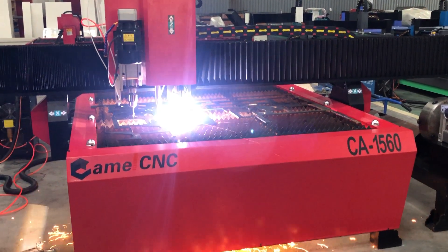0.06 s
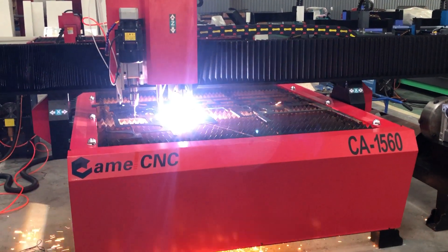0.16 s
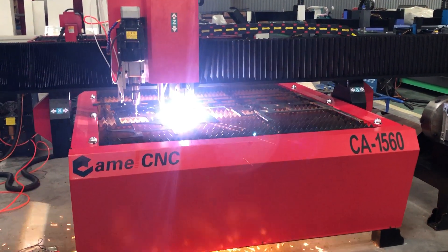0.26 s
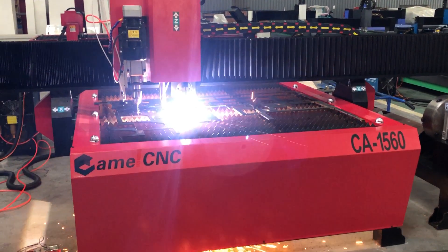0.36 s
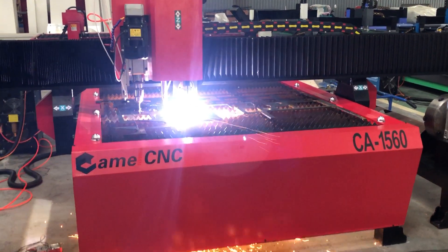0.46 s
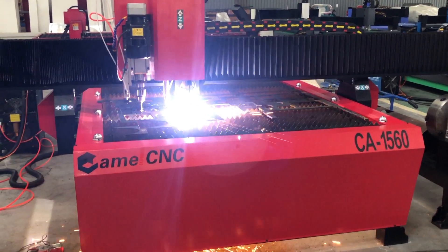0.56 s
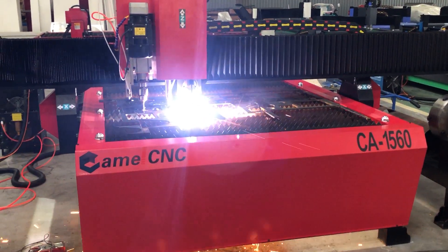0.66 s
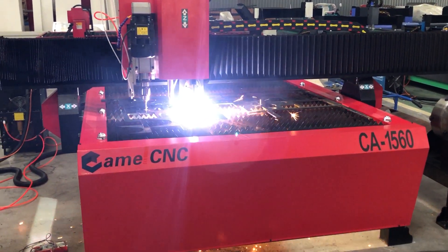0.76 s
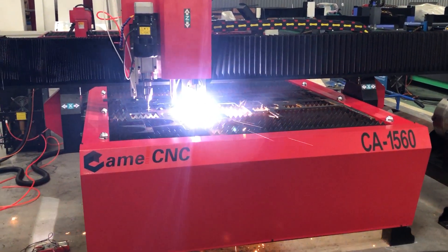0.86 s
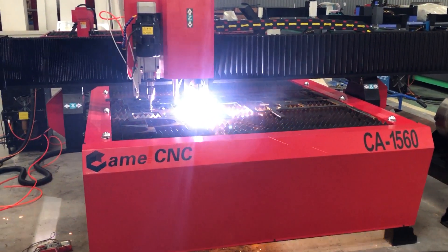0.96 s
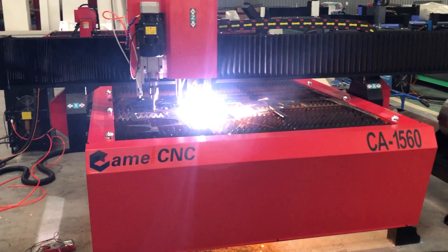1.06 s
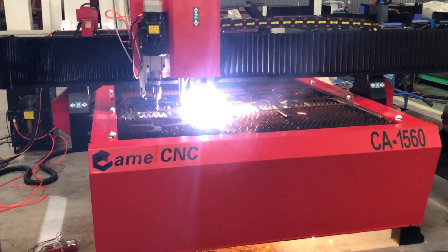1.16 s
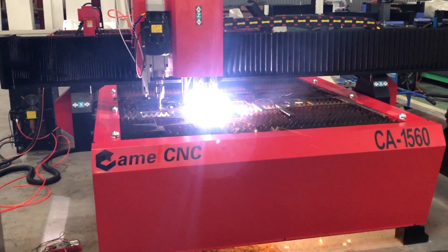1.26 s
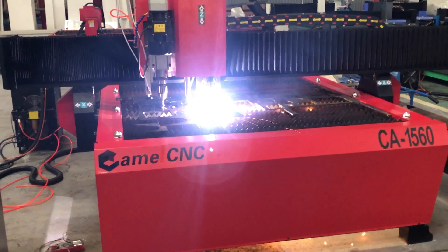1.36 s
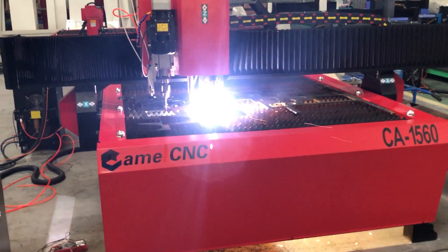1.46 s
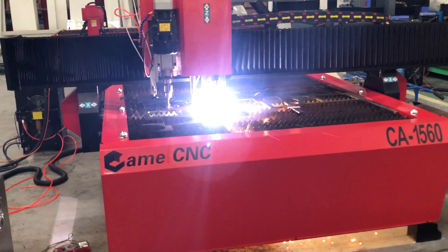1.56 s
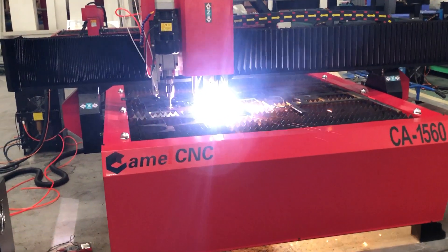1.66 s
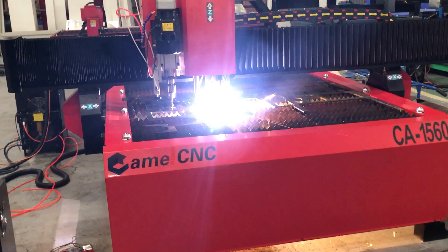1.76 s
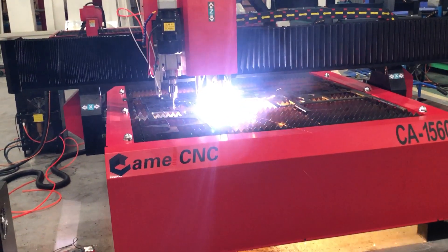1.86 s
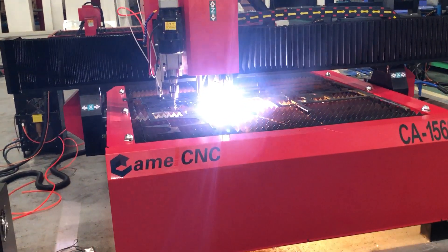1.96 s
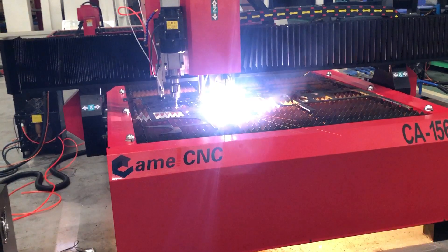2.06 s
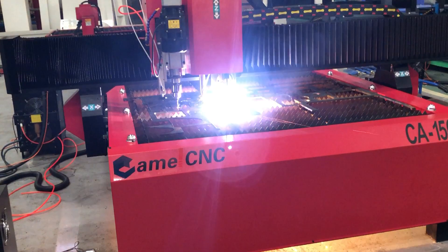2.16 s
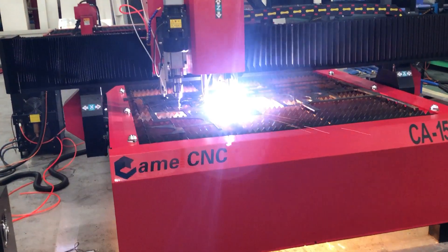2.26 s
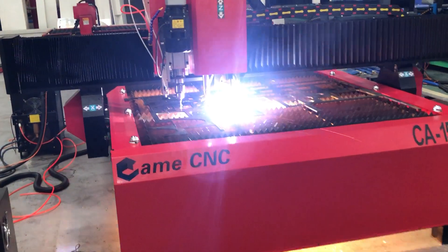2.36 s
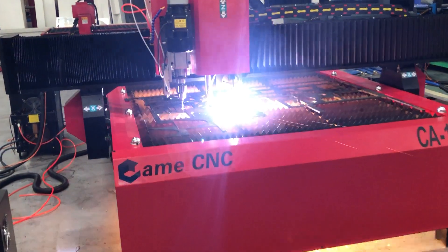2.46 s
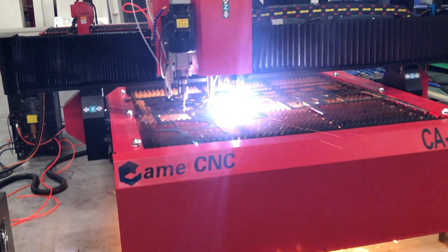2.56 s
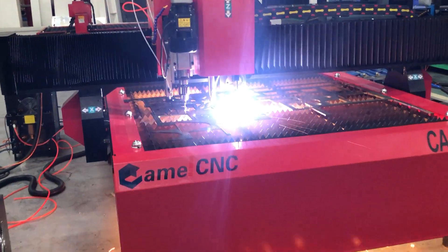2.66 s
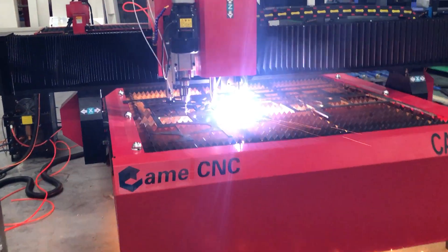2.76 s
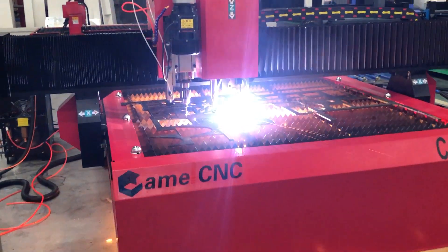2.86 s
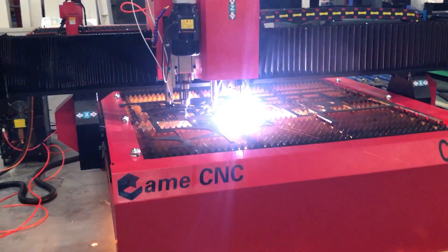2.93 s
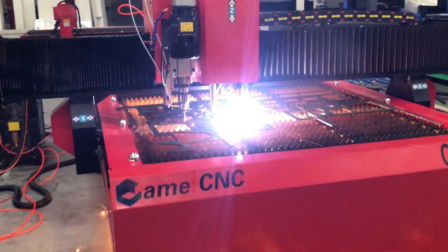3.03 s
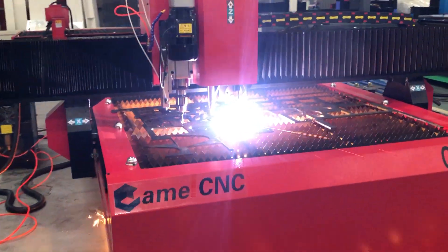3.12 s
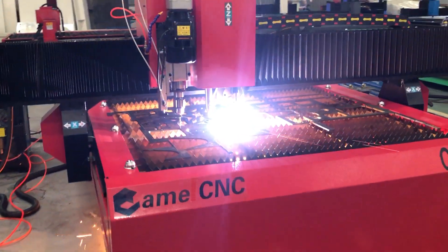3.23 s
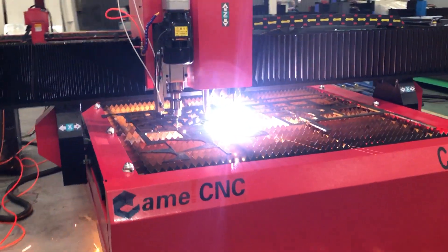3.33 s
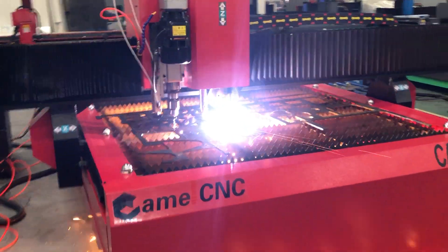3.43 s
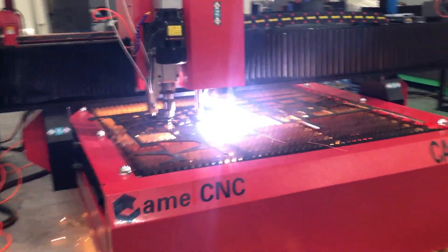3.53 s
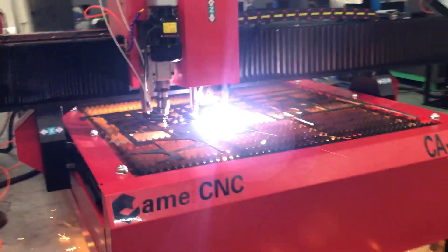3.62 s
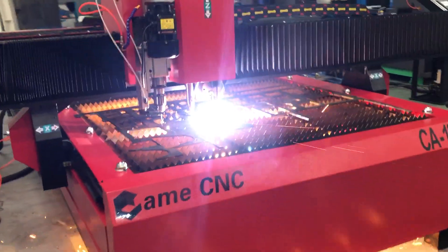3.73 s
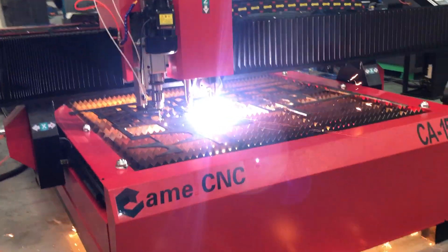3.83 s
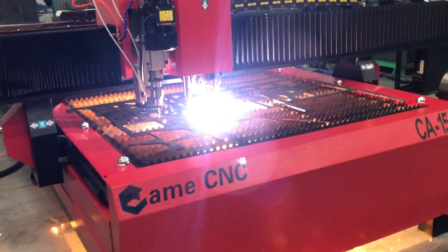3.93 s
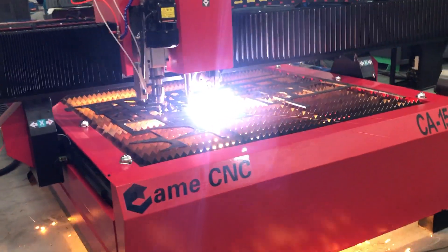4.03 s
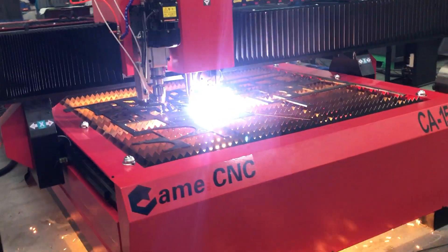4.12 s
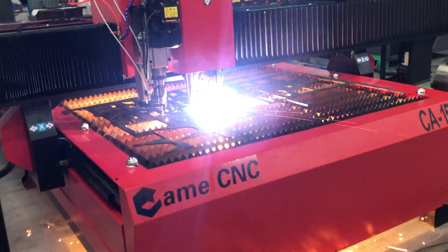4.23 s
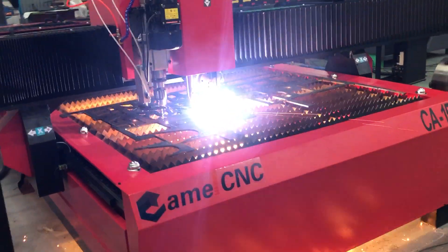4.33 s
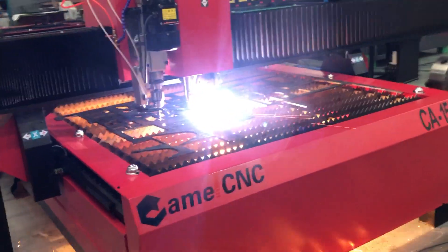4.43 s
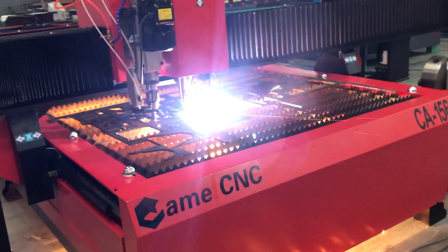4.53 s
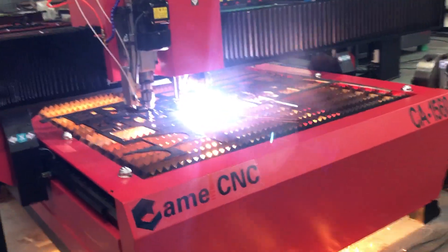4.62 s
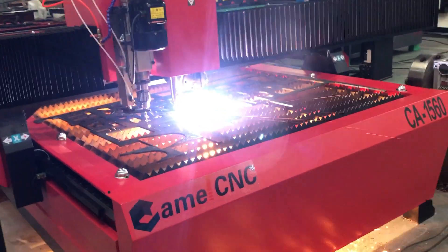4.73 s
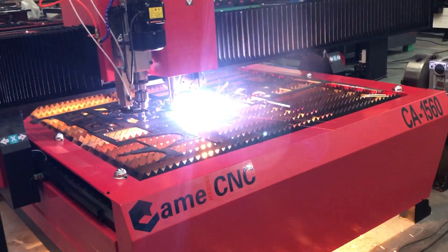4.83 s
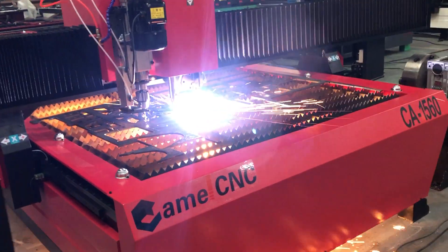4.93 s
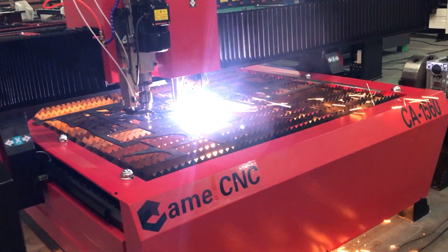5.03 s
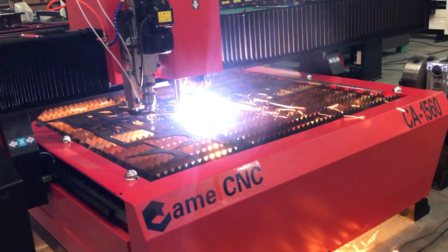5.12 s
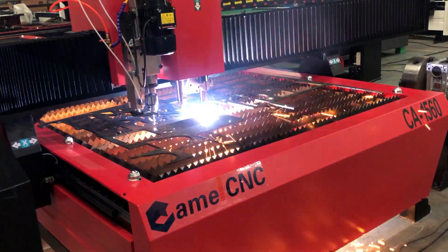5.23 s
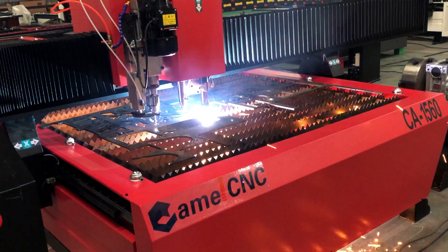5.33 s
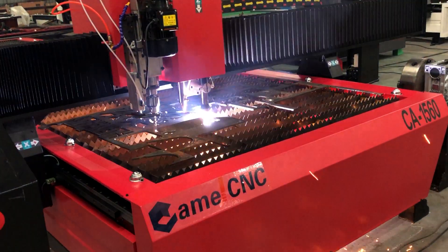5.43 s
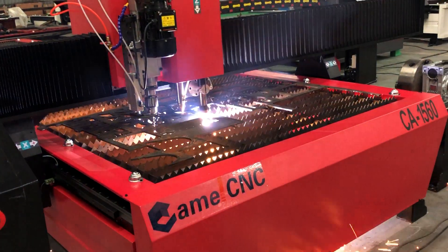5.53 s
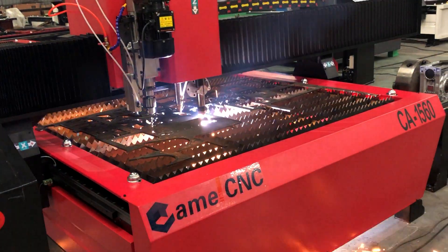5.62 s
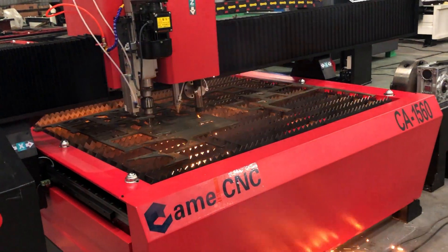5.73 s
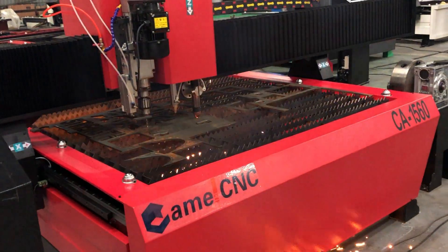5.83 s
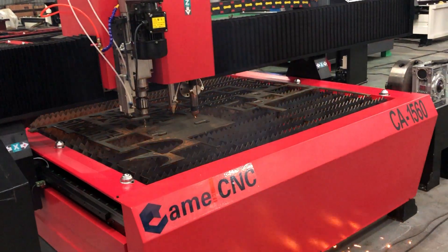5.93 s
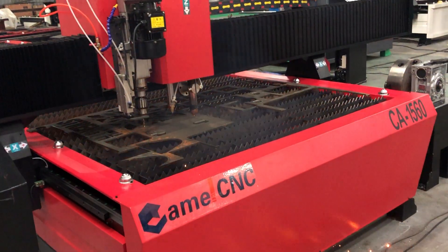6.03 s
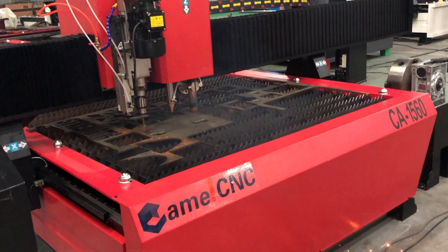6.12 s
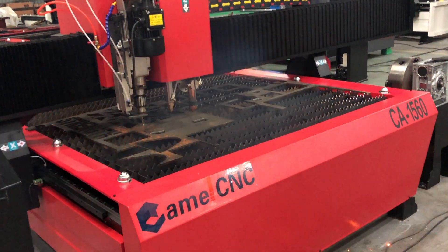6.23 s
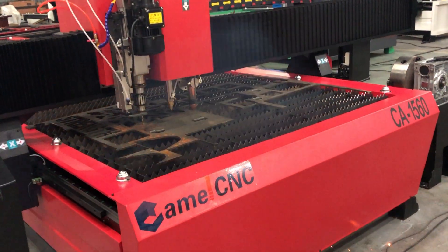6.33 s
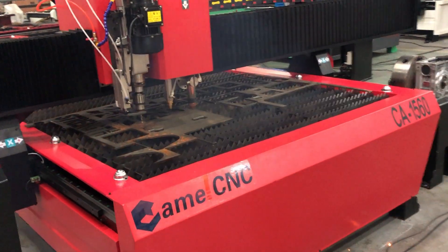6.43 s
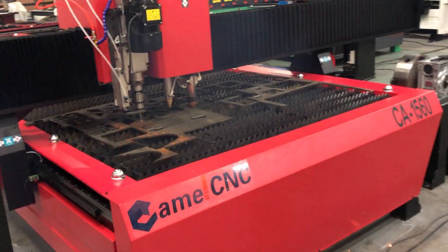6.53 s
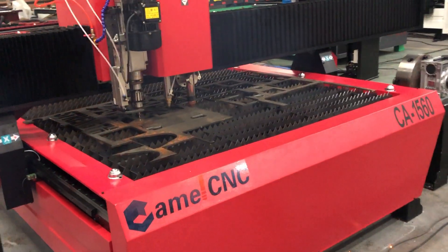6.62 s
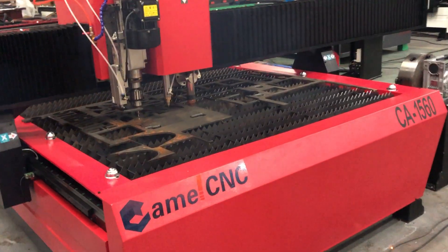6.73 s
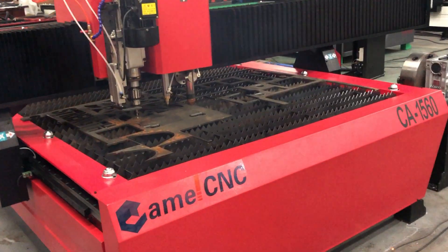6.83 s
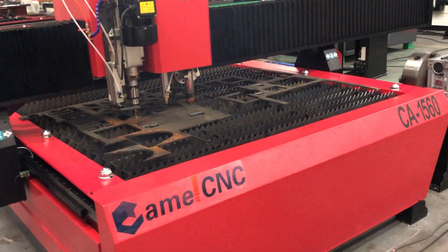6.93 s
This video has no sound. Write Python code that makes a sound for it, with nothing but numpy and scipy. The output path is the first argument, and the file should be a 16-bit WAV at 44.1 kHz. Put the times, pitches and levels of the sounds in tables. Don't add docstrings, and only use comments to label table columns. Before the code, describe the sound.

Harsh sputtering torch hiss for nearly six seconds, a sudden pop as it stops, then soft streaming gas, a short whine and humming fans.

```python
import sys
import numpy as np
from scipy import signal
from scipy.fft import rfft, irfft, next_fast_len
from scipy.io import wavfile
from scipy.ndimage import uniform_filter1d, map_coordinates

SR = 44100
rng = np.random.default_rng(int(sys.argv[2]) if len(sys.argv) > 2 else 0)


def transcribe(signal):
    frames = np.atleast_2d(signal).T
    limited = np.clip(frames, -1, 1)
    pcm = np.round(limited * 32767).astype(np.int16)
    wavfile.write(sys.argv[1], SR, pcm)


def volts(x):
    e = np.asarray(x, float) / 20
    return 10 ** e


N = 307799
WINDOW = 2048
OFF_S = 5.772
WIDTH_HZ, WIDTH_SHARE = 32, 0.0078


def unit(x):
    return x / np.sqrt(np.mean(np.abs(x) ** 2) + 1e-20)


def along(points, hz):
    f, v = np.transpose(points)
    return np.interp(np.log(hz + 1), np.log(f + 1), v)


def wobble(rate):
    knots = rng.standard_normal(int(N * rate / SR) + 6)
    return map_coordinates(knots, [np.arange(N) * rate / SR])


def noise_spectrum():
    return signal.stft(rng.standard_normal(N), SR, nperseg=WINDOW, noverlap=WINDOW * 3 // 4)


def sound(z):
    return signal.istft(z, SR, nperseg=WINDOW, noverlap=WINDOW * 3 // 4)[1][:N]


def layers(rows, responses, hz, t):
    s, *curves = np.transpose(rows)
    return sum(along(r, hz)[:, None] * np.interp(t, s, c) for r, c in zip(responses, curves))


def drifting(rows, hz, t, base_hz, share):
    flutter, flutter_s = 0.4, 0.1
    colour = 0
    for s0, s1, hz0, hz1, db in rows:
        way = np.clip((t - s0) / (s1 - s0), 0, 1)
        centre = hz0 + (hz1 - hz0) * way
        near = np.exp(-.5 * ((hz[:, None] - centre) / (base_hz + share * hz0)) ** 2)
        waver = np.interp(t, np.arange(0, 8, flutter_s), rng.uniform(-1, 1, round(8 / flutter_s)))
        swell = np.abs(np.sin(np.pi * way)) ** .5
        colour = colour + db * (1 + flutter * waver) * swell * near
    return colour


def echoes(hz, t, low_db, high_db):
    patch_db = 1.22
    chance = rng.standard_normal((len(hz), len(t)))
    field = uniform_filter1d(chance, size=2, axis=0)
    patches = chance[::-1]
    for _ in range(2):
        field = uniform_filter1d(field, size=18, axis=1)
        patches = uniform_filter1d(patches, size=5, axis=0)
        patches = uniform_filter1d(patches, size=7, axis=1)
    field = unit(field - uniform_filter1d(field, size=16, axis=0))
    patches = unit(patches - uniform_filter1d(patches, size=40, axis=0))
    depth_db = along([(1000, low_db), (12000, high_db)], hz)[:, None]
    return volts(depth_db * np.tanh(field) + patch_db * patches)


def knock(modes, s, rise):
    x = np.zeros(N)
    t = np.arange(SR // 4) / SR
    ring = sum(volts(db - 60 * t / t60) * np.sin(2 * np.pi * hz * t) for hz, db, t60 in modes)
    x[round(s * SR):][:len(t)] = ring * (1 - np.exp(-t / rise))
    return x


def shop():
    # (frequency [Hz], level [dB per Hz])
    rumble_colour = [(20, -60), (33, -22), (48, -1), (75, -8), (110, -5), (140, -4.5), (190, -0.5),
                     (260, 0), (400, -4.5), (600, -12), (1200, -46)]
    # (time [s], level [dB])
    fan_nearness = [
        (0, 0.5),
        (2.3, 1),
        (3.5, -1),
        (5.5, -1.5),
        (5.95, -3),
        (6.14, 1),
        (6.28, 0),
        (6.4, 5),
        (6.5, 2.5),
        (6.98, 8),
    ]
    # (frequency [Hz], share of the nearness [1])
    fan_response = [(95, 0), (250, 0.68)]
    # (from [s], to [s], from [Hz], to [Hz], level [dB])
    deep_shadow = [
        (5.15, 5.8, 60, 60, -8),
        (4.05, 5.05, 90, 90, 3.5),
        (2.6, 3.2, 90, 90, 2),
    ]
    # (frequency [Hz], level [dB])
    hum_tones = [(258.4, -58), (196.3, -59.5), (49, -68.5)]
    # (time [s], level [dB])
    hum_swell = [
        (0, -3.5),
        (5.9, -3),
        (6.14, 6),
        (6.28, -2),
        (6.45, 6),
        (6.6, 9),
        (6.76, 3),
        (6.93, 10),
        (6.98, 8),
    ]
    hz, t, z = noise_spectrum()
    time = np.arange(N) / SR
    colour = along(rumble_colour, hz)[:, None] + layers(fan_nearness, [fan_response], hz, t)
    colour += drifting(deep_shadow, hz, t, 60, 0)
    rumble = unit(sound(z * volts(colour)))
    surge = volts(-51.5 + 0.5 * wobble(5))
    hum = sum(volts(db + 1.6 * wobble(6.3)) * np.sin(2 * np.pi * f * time + 0.52 * wobble(6))
              for f, db in hum_tones)
    return surge * rumble + hum * volts(np.interp(time, *np.transpose(hum_swell)))


def leak():
    # (frequency [Hz], level [dB per Hz])
    leak_colour = [(9000, -30), (13500, -10), (14800, 5), (16000, 0)]
    # (time [s], level [dB])
    leak_swell = [
        (5.9, -44),
        (6.1, -44),
        (6.25, -47),
        (6.5, -46),
        (6.72, -44),
        (6.8, -40),
        (6.98, -42),
    ]
    hz, t, z = noise_spectrum()
    hiss = unit(sound(z * volts(along(leak_colour, hz))[:, None]))
    level_db = np.interp(np.arange(N) / SR, *np.transpose(leak_swell))
    return volts(level_db + .5 * wobble(4)) * hiss


def lift():
    # (time [s], level [dB])
    whine_swell = [
        (6.03, -68),
        (6.075, -54),
        (6.1, -60),
        (6.155, -53),
        (6.185, -47.5),
        (6.215, -44),
        (6.28, -43.5),
        (6.295, -53),
        (6.33, -66),
    ]
    # (frequency [Hz], level [dB])
    whine_partials = [(1036, 0), (1108, -5), (2138, -10.5)]
    # (frequency [Hz], level [dB], t60 [s])
    start_modes = [(970, -38, .15), (780, -50, .08)]
    # (frequency [Hz], level [dB], t60 [s])
    stop_modes = [(650, -37, 0.14), (750, -48, .1), (820, -36, 0.21), (1345, -50, .07)]
    t = np.arange(N) / SR
    s, db = np.transpose(whine_swell)
    tones = sum(volts(g + .8 * wobble(15)) * np.sin(2 * np.pi * hz * t + .2 * wobble(15))
                for hz, g in whine_partials)
    whine = np.sqrt(2) * volts(np.interp(t, s, db, left=-120, right=-120)) * tones
    return whine + knock(stop_modes, 6.31, rise=.025) + knock(start_modes, 6.05, rise=.02)


def gas():
    # (frequency [Hz], level [dB per Hz])
    gas_colour = [(300, -25), (450, -9), (800, -3), (1500, -6), (2200, -6.5), (4000, -4.5), (7000, -5),
                  (8500, -7.5), (14000, -9), (16000, -11)]
    # (time [s], flow [dB], jet beam on the microphone [dB])
    gas_course = [(5.9, 1, 6), (5.97, -1, 5), (6.05, -3, 4.5), (6.12, -3, 4), (6.2, -1.5, 1),
                  (6.27, -1, -3), (6.38, -1, -3.5), (6.46, -.5, -5), (6.58, 1.2, -4), (6.75, 1.5, -1),
                  (6.98, 2.5, -0.5)]
    # (frequency [Hz], share [1])
    flow_response = [(500, .2), (1000, 0.58), (2600, 1.2), (6000, 0.98)]
    # (frequency [Hz], share [1])
    beam_response = [(6000, 0), (11000, 1)]
    # (from [s], to [s], from [Hz], to [Hz], level [dB])
    gas_cavities = [(6.4, 7.4, 1350, 1440, 6), (6.4, 7, 1550, 1540, 4), (6.5, 7.3, 2100, 2100, -5),
                    (6.7, 7.3, 2200, 2260, 5), (6.7, 7.3, 1850, 1880, 4), (6.3, 6.9, 2480, 2560, 1),
                    (6.2, 7.2, 2800, 2950, 4), (5.8, 6.1, 2730, 2740, 1), (6.35, 6.8, 1180, 1200, -7),
                    (5.8, 5.6, 2000, 2000, -4), (6.2, 7.2, 3950, 3950, 2), (6.5, 7.3, 9200, 9200, 3),
                    (6.45, 7.7, 660, 660, 4.5), (6.4, 6.85, 530, 610, -6), (6.7, 6.95, 880, 840, 4)]
    hz, t, z = noise_spectrum()
    colour = along(gas_colour, hz)[:, None] + layers(gas_course, [flow_response, beam_response], hz, t)
    colour += drifting(gas_cavities, hz, t, WIDTH_HZ, WIDTH_SHARE)
    flow = sound(z * volts(colour) * echoes(hz, t, low_db=2.5, high_db=3.5))
    after = np.arange(N) > OFF_S * SR
    return volts(-36 + 0.43 * wobble(12)) * flow * after / np.std(flow[after])


def pop():
    # (frequency [Hz], level [dB], t60 [s])
    pop_modes = [(1330, -16, .009), (890, -22, .018), (644, -19, .016), (450, -25, .018), (310, -27, .022)]
    # (frequency [Hz], level [dB], t60 [s])
    thump_modes = [(70, -31, .05), (110, -27, .045), (200, -29, .04)]
    answers = [(0, 5), (.0078, -2.5), (.0135, -7), (.0183, -3)]  # (delay [s], level [dB])
    snap = sum(volts(db) * knock(pop_modes, OFF_S - .0007 + late, rise=.0007 + .03 * late)
               for late, db in answers)
    return snap + knock(thump_modes, OFF_S + 0.0065, rise=0.0028)


def arc():
    # (frequency [Hz], level [dB per Hz])
    arc_colour = [(180, -53), (300, -18.5), (518, -14), (592, -12), (710, -13), (798, -8), (1010, -8.5),
                  (1250, -6), (1630, -5.5), (2420, -6), (4400, -4.5), (13600, 1.5), (15000, -1.5),
                  (15800, -7.5)]
    # (time [s], nearness [dB], view into the cut [0-1], jet beam on the microphone [dB])
    arc_course = [(0, -1.5, 0.16, 4), (.38, -1.5, 0, 0), (.7, -0.5, 0.1, -0.5), (.95, -0.5, 0, 1),
                  (1.2, -.5, 0, 1.5), (1.32, -.5, 0.8, -3), (1.9, -1.5, 0.63, -.5), (2.3, -1, 0.86, 2),
                  (2.7, 0.5, 0.8, -0.5), (2.9, -2, 0.8, 1.5), (3.2, -.5, 0.87, 0), (3.65, -.5, 0.9, 1),
                  (3.9, -1.5, 0.94, 1.5), (4.2, -1, 1.1, 0), (4.7, -1.5, 0.74, 1), (5.15, -2, 0.6, 1),
                  (5.5, -1, 0.85, -1), (5.75, -1, 1, -1.5)]
    # (frequency [Hz], level [dB])
    view_response = [(600, 1), (1000, -1), (2000, -3), (3100, -1), (3600, 2), (5500, 2), (8000, 1.5),
                     (14000, 0)]
    # (frequency [Hz], share [1])
    beam_response = [(6500, 0), (10500, 1), (15000, 0)]
    # (frequency [Hz], width [Hz], level [dB])
    edge_whistle = (15400, 1130, 3.7)
    # (from [s], to [s], from [Hz], to [Hz], level [dB])
    cavities = [(-.6, 1.15, 770, 760, 4.5), (1.0, 3.5, 815, 810, 6), (2.5, 3.16, 950, 920, 7),
                (2.95, 3.4, 1020, 1080, 6), (3, 4.06, 1150, 1120, 6.5), (4, 4.8, 1170, 1170, 4),
                (-0.2, 2.4, 1240, 1265, 6), (0.7, 1.56, 1200, 1190, 2.5), (2.5, 3.13, 1250, 1230, 6),
                (-0.5, 1.7, 1390, 1340, 5.5), (-0.5, 1.6, 1520, 1550, 3.5), (1.5, 1.82, 1490, 1430, 7),
                (3.5, 4.2, 1300, 1340, 5), (4, 5.1, 1230, 1330, 6), (4.4, 5.5, 1420, 1350, 4),
                (5.4, 6.3, 1300, 1360, 5), (5.2, 6.2, 1470, 1420, 4), (3.3, 4.0, 610, 600, 5.5),
                (3.9, 5.1, 650, 600, 8), (5.0, 5.7, 590, 620, 5.5), (4.95, 5.7, 925, 945, 7),
                (4.45, 5.2, 790, 810, 4), (5.3, 6.2, 1150, 1150, 4), (3.5, 4.24, 1650, 1670, 6),
                (-0.5, 1.0, 1830, 1890, 6), (-0.5, 1.6, 2130, 2160, 5.5), (2, 2.44, 2260, 2270, 5),
                (2.1, 3.16, 2200, 2130, 4.5), (3.0, 3.83, 2250, 2220, 8), (3.5, 4.66, 2280, 2280, 5.5),
                (0.5, 1.4, 2620, 2500, 5.5), (1, 2.6, 2500, 2500, 3), (2.0, 2.7, 2700, 2670, 3.5),
                (-1, 0.37, 2870, 2880, 5.5), (0.4, 1.43, 2860, 2870, 7.5), (5.5, 6.2, 2630, 2600, 8),
                (6, 6.2, 2500, 2500, 4), (5.0, 6, 3100, 3130, 4), (0, .7, 430, 450, 3.5),
                (1.2, 2.4, 3560, 3380, 3), (3.6, 4.15, 3560, 3640, 4), (4.5, 5.2, 3940, 4060, 6.5),
             (3.7, 4.3, 4130, 4200, 5), (2.5, 3.4, 4300, 4300, 4), (3.0, 3.45, 4600, 4620, 4),
             (4.7, 5.3, 4440, 4350, 5.5), (4.0, 4.7, 4800, 4700, 4.5), (-.3, 1.0, 4850, 4950, 2),
             (-.2, 0.36, 5200, 5200, 3), (1.0, 1.9, 5350, 5480, 3), (.7, 2.1, 5680, 5620, 1),
             (4, 4.75, 5350, 5300, 3.5), (5.15, 5.62, 5550, 5560, 9), (5.62, 6.0, 5400, 5530, 6.5),
             (5.55, 5.9, 5750, 5900, 6), (5.55, 6.0, 5980, 6120, 5), (3, 4.1, 6200, 6080, 2),
             (-0.5, .9, 6700, 6300, 3), (0.7, 1.4, 6300, 6400, 3), (5.3, 5.62, 6780, 6700, 4.5),
             (5.5, 6.1, 7130, 7100, 5), (1.4, 2.1, 6900, 7000, 4), (.75, 1.5, 7600, 7530, 5),
             (4.0, 5.5, 7050, 7600, 3.5), (2.4, 3.0, 8230, 8170, 4.5), (5.3, 6.1, 9250, 9200, 5.5),
             (.6, 1.17, 10000, 9680, 4), (3.1, 3.8, 8200, 9000, 3), (2.0, 2.6, 8680, 8680, 3),
             (4.3, 5.15, 3780, 3730, 5), (2.3, 2.8, 5150, 5250, 4), (2.1, 2.7, 6650, 6600, 4),
             (3.55, 4.1, 3220, 3180, 4), (-.3, .6, 3460, 3450, 4)]
    # (from [s], to [s], from [Hz], to [Hz], level [dB])
    nulls = [(3.5, 6.1, 870, 1080, -11.5), (3.3, 7.6, 1780, 1880, -4.5), (3.5, 6.8, 433, 400, -10),
             (2.5, 2.9, 1900, 1900, -3), (.4, 2.2, 1660, 1560, -5), (3.5, 5.2, 2200, 2340, -1),
             (3.5, 4.1, 2750, 2780, -2), (-.3, 1, 640, 610, -5), (-1, .8, 5450, 5600, -7),
             (2.2, 2.6, 4000, 4050, -6), (3.5, 4.1, 5500, 6900, -6), (3, 3.3, 5550, 5400, -6),
             (3.5, 4.2, 8200, 8200, -2), (3, 3.1, 3720, 3680, -7), (5.4, 6, 7200, 7400, -5)]
    # (from [s], to [s], from [Hz], to [Hz], level [dB])
    shades = [(2.5, 4.14, 1010, 1200, 3.5), (4, 6.1, 940, 940, -2.5), (2.0, 3.6, 3430, 3330, -2.5),
              (3, 3.9, 7600, 6800, 2.5), (-.5, 1.8, 13200, 12200, -2), (0, 0.99, 10500, 9900, 2),
              (4, 5.5, 13400, 13500, 2), (4.5, 5.7, 3900, 3600, 2), (1, 1.8, 5000, 5900, -3),
              (1.1, 2.0, 14800, 15000, 1.5), (2.5, 4.5, 14000, 14500, -1), (4, 4.7, 2850, 2900, 1.5),
              (5, 6.1, 3040, 2950, 2), (1.5, 2.73, 1800, 1900, -2), (3.5, 3.9, 1450, 1400, -0.5),
              (0.4, 1.8, 470, 460, 2.5), (5.5, 5.7, 1500, 1550, 2), (1.4, 1.66, 1900, 1950, 2.5),
              (3.5, 3.5, 4400, 4400, 1), (6, 6.0, 5550, 5900, 1)]
    hz, t, z = noise_spectrum()
    colour = along(arc_colour, np.minimum(hz, 15050))[:, None]
    colour = colour + layers(arc_course, [[(1, 0.72)], view_response, beam_response], hz, t)
    edge_hz, edge_width_hz, edge_db = edge_whistle
    edge_heard = np.clip((t - 2.04) / 0.25, 0, 1)
    colour += edge_db * np.exp(-.5 * ((hz[:, None] - edge_hz) / edge_width_hz) ** 2) * edge_heard
    colour += drifting(cavities + nulls, hz, t, WIDTH_HZ, WIDTH_SHARE)
    colour += drifting(shades, hz, t, WIDTH_HZ, 0.056)
    jet = unit(sound(z * volts(colour) * echoes(hz, t, low_db=3, high_db=4.2)))
    flicker = wobble(36)
    flicker -= .6 * uniform_filter1d(flicker, size=SR // 18)
    sputter = volts(.95 * flicker + .8 * wobble(400))
    burning = volts(-700 * np.clip(np.arange(N) / SR - OFF_S + 0.0018, 0, 1))
    return volts(-18.0) * unit(jet * sputter) * burning


def hall(x):
    # (frequency [Hz], t60 [s])
    hall_decay = [(200, 0.37), (2000, 0.28), (8000, 0.48), (15000, 0.12)]
    hz, t, z = signal.stft([x, rng.standard_normal(N)], SR, nperseg=256)
    keep = volts(-120 * t[1] / along(hall_decay, hz))
    power = np.abs(z[0]) ** 2
    stored = [signal.lfilter([0, 0, 1 - k], [1, -k], row) for k, row in zip(keep, power)]
    return signal.istft(np.sqrt(stored) * unit(z[1]), SR, nperseg=256)[1][:N]


def scene():
    torch = arc() + pop()
    mono = torch + volts(-8.5) * hall(torch) + gas() + lift() + shop() + leak()
    return np.array([mono, mono])


def opposed_bands(mono):
    # (time [s], from [Hz], to [Hz])
    band_events = [(.16, 8270, 9730), (.414, 5170, 8300), (.436, 11020, 12400), (.486, 6890, 8900),
                   (.695, 11710, 13200), (.855, 13090, 14560), (1.02, 12400, 13780), (1.02, 14470, 15600),
                   (1.133, 10340, 11800), (1.205, 13010, 15250), (1.507, 8960, 11710), (1.647, 8270, 9650),
                   (1.74, 12400, 13780), (1.98, 13780, 15740), (1.994, 5680, 6890), (1.995, 7580, 10340),
                   (2.319, 12320, 15500), (3.712, 5140, 6230), (3.712, 10300, 11710), (3.967, 4200, 5140),
                   (4.317, 14300, 15600), (4.341, 5170, 6290), (4.546, 5680, 6890), (4.849, 4650, 5680),
                   (4.85, 14500, 15500), (5.129, 5170, 6290), (5.846, 4280, 5680), (6.012, 10420, 12400),
                   (6.708, 8350, 10240), (6.93, 14470, 15740)]
    side = np.zeros(N + WINDOW)
    hz = np.fft.rfftfreq(WINDOW, 1 / SR)
    for s, low_hz, high_hz in band_events:
        start = round(s * SR) - WINDOW // 2
        inside = (hz > low_hz) * (hz < high_hz)
        present = irfft(rfft(mono[start:][:WINDOW], WINDOW) * inside)
        band = irfft(rfft(rng.standard_normal(WINDOW) * np.hanning(WINDOW)) * inside)
        side[start:][:WINDOW] += volts(-6.5) * np.std(present) * unit(band)
    return np.array([side[:N], -side[:N]])


def band_limit(x):
    return signal.sosfilt(signal.butter(12, 17100, fs=SR, output="sos"), x)


def record(dry):
    # (frequency [Hz], width [Hz], level [dB])
    capsule = (15350, 700, 3.2)
    top_hz, low_hz = 15730, 42
    m = next_fast_len(N)
    hz = np.fft.rfftfreq(m, 1 / SR)
    passed = (hz < top_hz) * hz ** 4 / (hz ** 4 + low_hz ** 4)
    peak_hz, width_hz, peak_db = capsule
    passed *= volts(peak_db * np.exp(-.5 * ((hz - peak_hz) / width_hz) ** 2))
    mix = irfft(rfft(dry + opposed_bands(dry[0]), m) * passed, m)[:, :N]
    return band_limit(mix)


dry = scene()
out = record(dry)
transcribe(out)
```